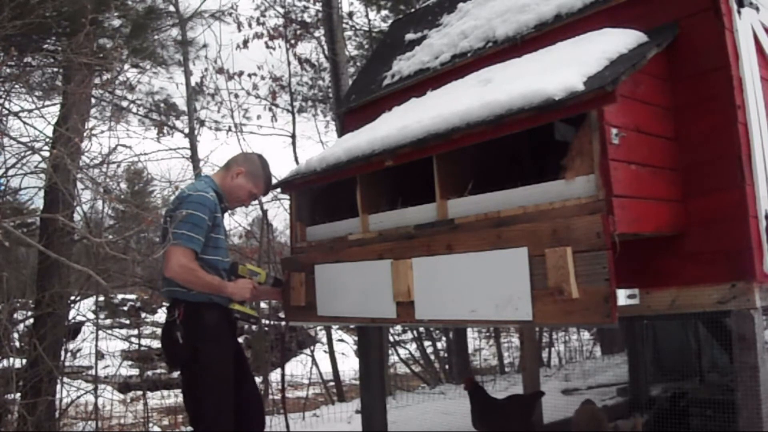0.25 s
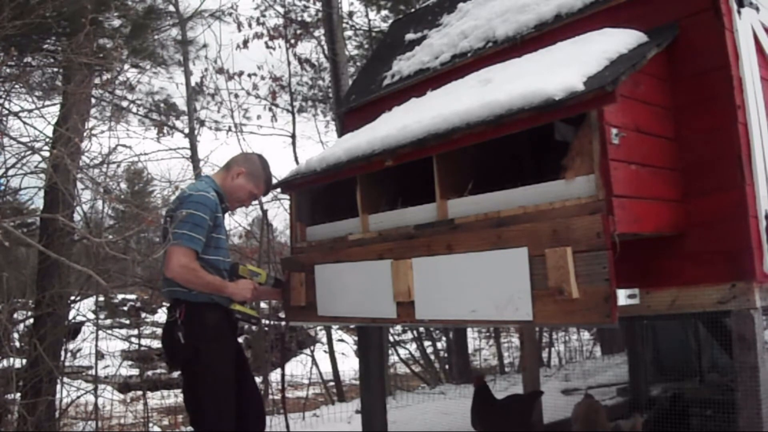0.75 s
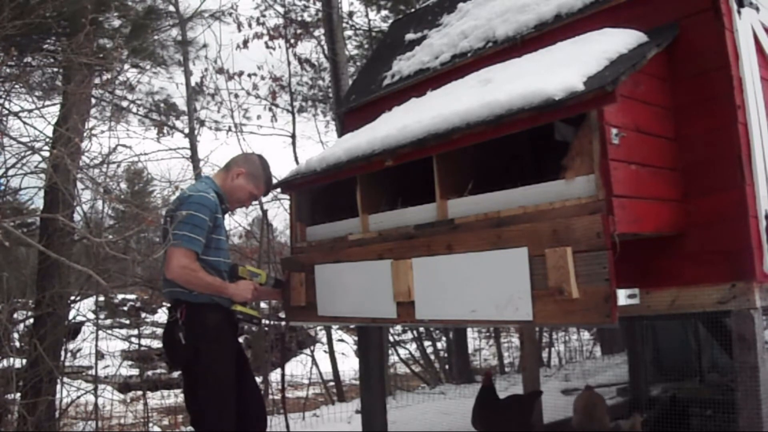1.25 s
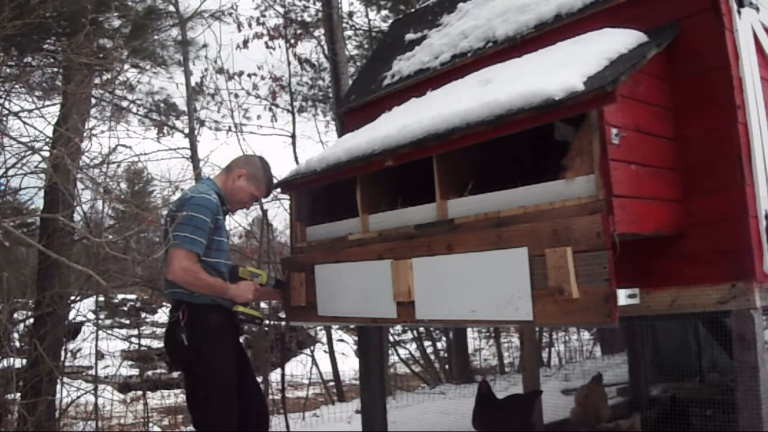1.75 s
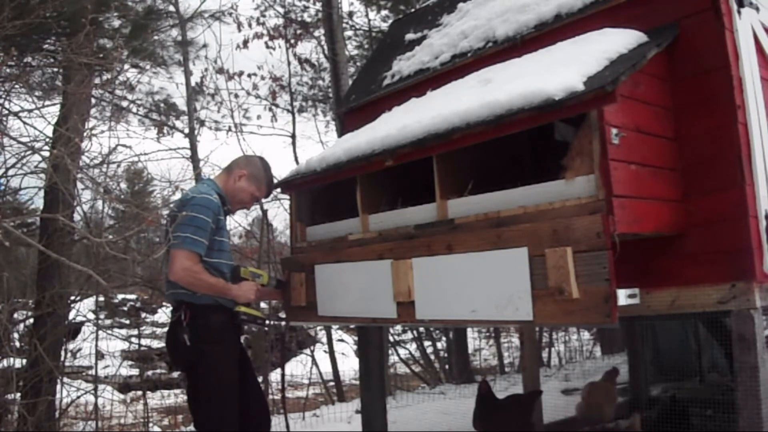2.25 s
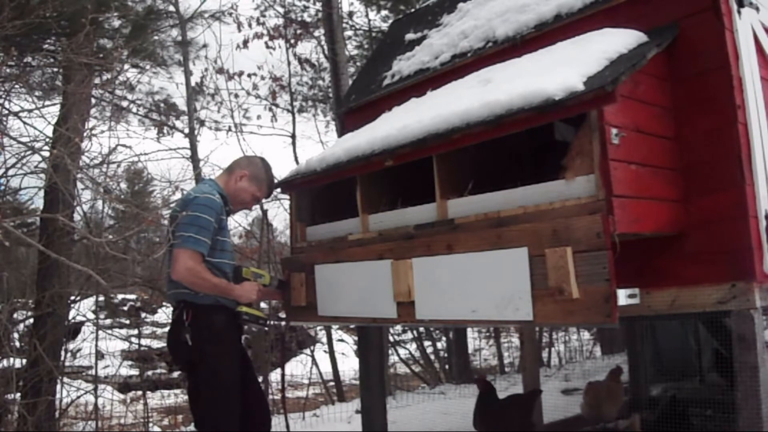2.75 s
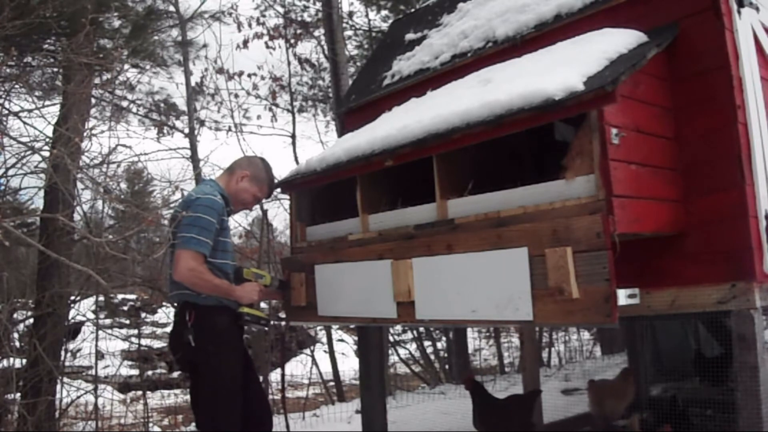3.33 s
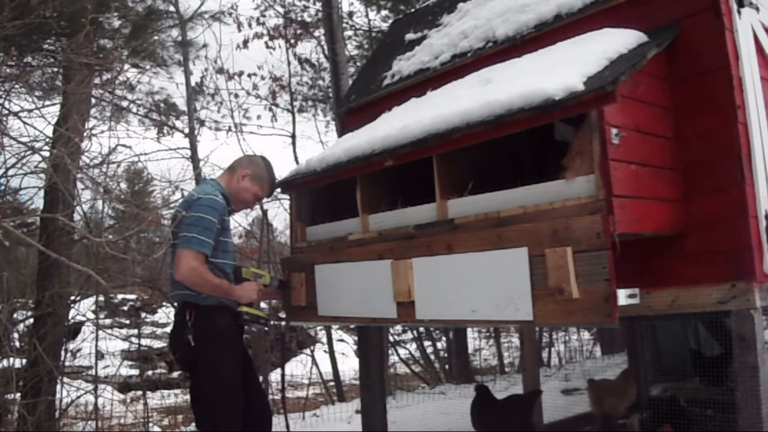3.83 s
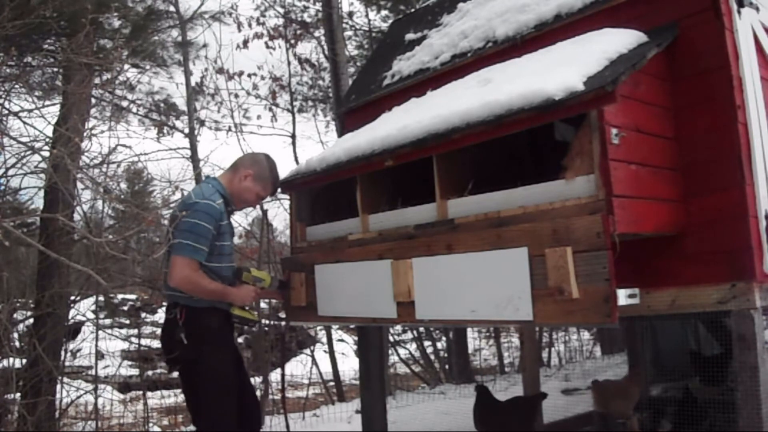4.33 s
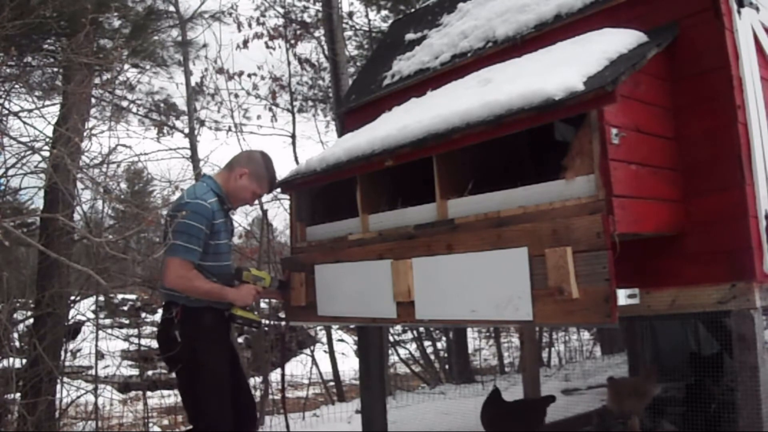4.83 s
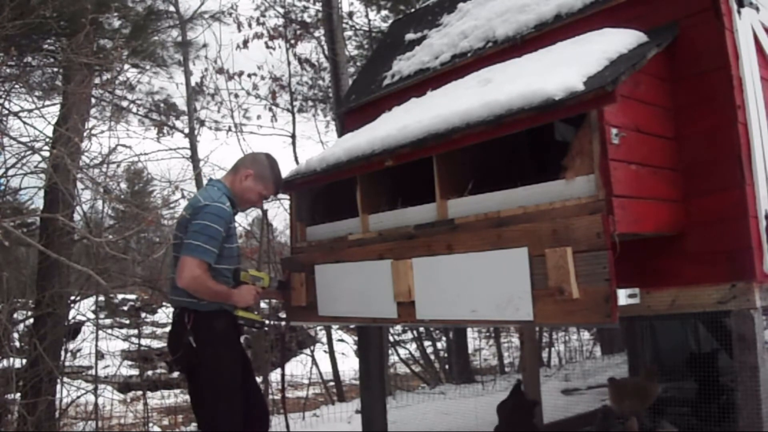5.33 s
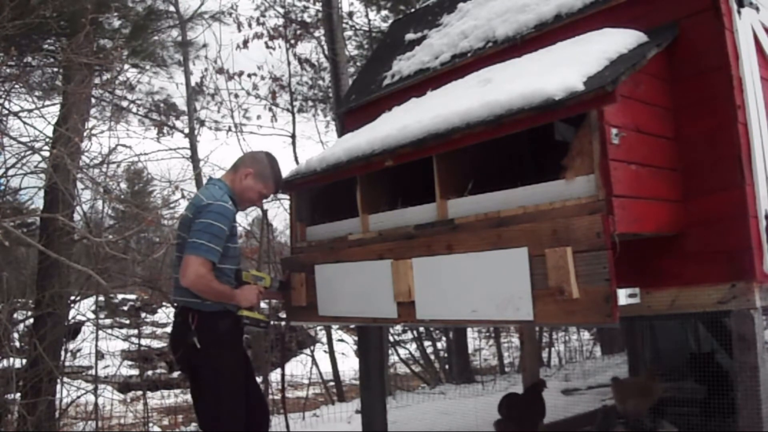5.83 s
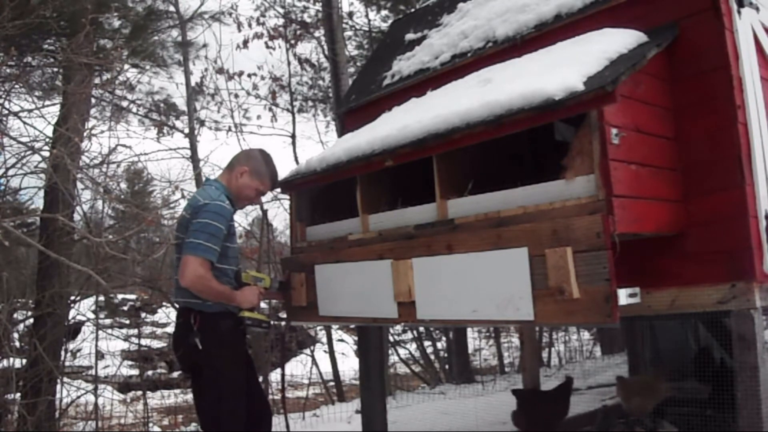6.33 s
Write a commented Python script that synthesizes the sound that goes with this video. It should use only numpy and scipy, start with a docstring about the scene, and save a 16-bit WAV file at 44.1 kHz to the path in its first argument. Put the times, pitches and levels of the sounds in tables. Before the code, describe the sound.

In still outdoor air, a cordless drill a few metres away pulses six times, its gears whining and rasping, then runs longer and winds down. A few soft clicks fill a quiet gap. The drill runs twice more, and each time the bit slips with a loud clack that briefly rings the wooden boards. Close to the microphone, a camera faintly whistles and buzzes throughout.

```python
"""Outdoors at a wooden hen house, a cordless drill a few metres from a camcorder's microphone.
Still air and the camera's faint whistle and buzz lie under it all. Six short pulls of the trigger come first,
then a longer one: the switch squeals, the gears whine and rasp, and at 2.4 s the bit jumps in the screw.
A pause follows, with a few soft clicks. From 5.2 s come two last pulls, each with a loud clack that rings
the boards and ducks the camera's gain."""
import sys
import numpy as np
from scipy import signal
from scipy.fft import rfft, irfft
from scipy.io import wavfile
from scipy.ndimage import uniform_filter1d

SR = 44100
rng = np.random.default_rng(int(sys.argv[2]) if len(sys.argv) > 2 else 0)


def bounce(signal):
    """Save signal as a 16-bit WAV file at the path given by the first command-line argument."""
    frames = np.transpose(np.atleast_2d(signal))
    limited = np.clip(frames, -1, 1)
    pcm = np.round(limited * 32767).astype(np.int16)
    wavfile.write(sys.argv[1], SR, pcm)


N = 289516
TIME = np.arange(N) / SR
BINS = np.fft.rfftfreq(N, 1 / SR)


def gain_of(db):
    """Decibels to an amplitude factor."""
    return 10 ** (np.asarray(db) / 20)


def unit_rms(x):
    """Scales to rms 1."""
    return x / np.sqrt(np.mean(x ** 2) + 1e-20)


def curve(points, hz=BINS):
    """Reads a table of (f/Hz, value) on a log-frequency axis."""
    f, value = np.transpose(points)
    return np.interp(np.log(hz + 1), np.log(f + 1), value)


def humps(modes):
    """Resonances as bumps in dB over frequency."""
    return sum(db / (1 + (2 * (BINS - hz) / width) ** 2) for hz, width, db in modes)


def colour(x, db):
    """A minimum-phase filter with the given gain in dB at each bin."""
    log_gain = np.log(gain_of(db))
    phase = -signal.hilbert(np.r_[log_gain, log_gain[-2:0:-1]]).imag[:len(BINS)]
    return irfft(rfft(x) * np.exp(log_gain + 1j * phase), N)


def drift(rate_hz):
    """A random wander of rms 1, mostly slower than rate_hz."""
    return unit_rms(irfft(rfft(rng.standard_normal(N)) / (1 + (BINS / rate_hz) ** 4), N))


def add(mix, start_s, sound):
    """Mixes a sound in at a time."""
    part = mix[round(start_s * SR):][:len(sound)]
    part += sound[:len(part)]


def air(level_db=-45):
    """The still air of the woods, a low wash, and the microphone's hiss with one narrow band standing out."""
    # spectrum of air and hiss: f/Hz, relative level/dB
    wash = [(12, -35), (20, 3.5), (53, -0.5), (146, -3), (193, -2.5), (255, -4), (574, -7.5), (1530, -13),
            (1910, -15), (2820, -13), (4810, -18), (10200, -19), (11400, -16.5), (12400, -18.5),
            (16000, -28)]
    noise = colour(rng.standard_normal(N), curve(wash) + humps([(7850, 260, 8.8)]))
    return gain_of(level_db) * unit_rms(noise)


def camera_whistles(high_hz=15734, high_db=-59):
    """At the microphone, two thin electronic tones: the lower swells and fades, the higher holds steady."""
    # contour of the lower tone: t/s, relative level/dB
    contour = [(0, -42.5), (.7, -47), (1.2, -46), (2.1, -50), (2.5, -46.5), (3.75, -48), (4.07, -61),
               (4.35, -44), (4.63, -54), (4.82, -43.5), (5.11, -58), (5.4, -43), (5.8, -47), (6.12, -59),
               (6.35, -43), (6.56, -45.5)]
    low = gain_of(np.interp(TIME, *np.transpose(contour)) - 3) * np.sin(2 * np.pi * 11719 * TIME)
    high = gain_of(high_db) * np.sin(2 * np.pi * high_hz * TIME)
    return np.sqrt(2) * (low + high)


def lens_motor(level_db=-50, first_s=.665, burst_s=.355, step_hz=61.2):
    """Beside the microphone the lens motor buzzes once a second, each step a dying puff of noise."""
    # resonances of the lens drive: f/Hz, width/Hz, level/dB
    lens_modes = [(3740, 670, 15.5), (4890, 490, 15.5), (7270, 190, 22.5), (9470, 1400, 19.5),
                  (12200, 830, 23)]
    tilt_db = curve([(1000, -15), (3000, 0.5), (12000, -9.0), (15000, -2)])
    moving = (TIME > first_s) & ((TIME - first_s) % 1 < burst_s)
    steps = np.exp(-(TIME * step_hz % 1) / 0.58) * rng.standard_normal(N)
    return gain_of(level_db) * moving * unit_rms(colour(steps, humps(lens_modes) + tilt_db))


def yard(x, wall_db=-13, wall_s=.0042, scatter_db=-21, taps_per_s=2000):
    """The direct sound, one quick reflection off the hen house, then a thin scatter from the trees."""
    # decay of the yard's echo: f/Hz, t60/s
    decay = [(300, 0.36), (3000, 0.23), (10000, 0.13)]
    count = SR // 3
    taps = rng.standard_normal(count) * (rng.random(count) < taps_per_s / SR) * (TIME[:count] > .008)
    hz, t, spectra = signal.stft(taps, SR, nperseg=256)
    tail = signal.istft(spectra * gain_of(-60 * t / curve(decay, hz)[:, None]), SR, nperseg=256)[1]
    echo = gain_of(scatter_db) * tail / np.linalg.norm(tail)
    echo[round(wall_s * SR)] += gain_of(wall_db)
    return x + signal.fftconvolve(x, echo)[:N]


def trigger():
    """The speed switch chops the current at a pitch that sags as the motor takes load."""
    # squeals of the switch: t/s, length/s, first f/Hz, last f/Hz, level/dB
    squeals = [(0.07, .048, 5320, 5270, -46.5), (0.42, 0.041, 5340, 5070, -46),
               (0.73, 0.033, 5230, 5020, -43), (1.05, 0.029, 5270, 5000, -44),
               (1.343, 0.023, 5340, 5030, -45), (1.712, 0.038, 5300, 5020, -43.5),
               (2.134, 0.024, 5350, 5000, -44), (6.185, 0.018, 5330, 5100, -52)]
    out = np.zeros(N)
    for start, length, first_hz, last_hz, db in squeals:
        hz = np.linspace(first_hz, last_hz, int(length * SR))
        tone = np.sqrt(2) * np.sin(2 * np.pi * np.cumsum(hz) / SR)
        add(out, start, gain_of(db) * tone * signal.windows.tukey(len(hz), .4))
    return out


def clacks(slip_s=.004, slip_db=-6.5, clack_t60=.01, tick_t60=.012, rattle_t60=.085, rattle_db=-14):
    """The bit jumps: a scrape swells to a crunch in the tool, steel ticks, and rattle and boards ring on."""
    # knocks of bit, screw and chuck: t/s, then relative level/dB of boards, tool and steel
    knocks = [(2.3906, -51, -24, -7), (3.8915, -65, -41.5, -52), (4.1206, -70, -66, -38),
              (4.4925, -63, -37, -46), (5.2505, -67, -33, -28), (5.2768, -62, -16.5, -19),
              (5.5965, -20.5, -5, -8), (5.619, -29.5, -22, -52), (5.6262, -55, -31, -14),
              (6.3917, -18.5, -9, -11), (6.422, -35, -26.5, -42), (6.514, -72, -49, -34.5)]
    # modes of the boards: f/Hz, level/dB, t60/s
    boards = [(198, -17.5, 0.16), (350, -26, 0.066), (507, -2.5, 0.042), (775, -1.5, 0.091),
              (827, -1.5, 0.066), (935, -7, 0.043), (1125, -4, 0.044), (1260, -7, 0.029)]
    # spectra of the tool's clack and the steel's tick: f/Hz, relative level/dB
    clack_spectrum = [(300, -24), (620, -27), (760, -8.5), (920, -18), (1100, -14), (1300, -7), (1500, -13),
                      (1900, -2.5), (2800, 2), (4100, -0.5), (5000, -16), (8000, -21), (12500, -37),
                      (15000, -66)]
    tick_spectrum = [(1500, -39), (3500, -5.5), (5400, -6), (6500, -15), (8500, -7), (9800, 0.5),
                     (11500, -9.5), (13500, -9.5), (15000, -35), (16000, -26)]
    t = np.arange(SR // 5) / SR
    landed = np.maximum(t - slip_s, 0)
    swell = gain_of(slip_db * np.maximum(1 - t / slip_s, 0))
    crunch = swell * (gain_of(-60 * landed / clack_t60) + gain_of(rattle_db - 60 * landed / rattle_t60))
    wood, tool, steel = np.zeros((3, N))
    for at, boards_db, tool_db, steel_db in knocks:
        tool_noise, steel_noise = rng.choice([-1., 1.], (2, len(t)))
        ring = sum(gain_of(db - 60 * t / t60) * np.sin(2 * np.pi * hz * rng.uniform(1.0, 1.03) * t)
                   for hz, db, t60 in boards)
        add(wood, at - slip_s / 2, gain_of(boards_db - 3) * ring / np.std(ring[:SR // 200]))
        add(tool, at - slip_s, gain_of(tool_db) * tool_noise * crunch)
        add(steel, at, gain_of(steel_db) * steel_noise * gain_of(-60 * t / tick_t60))
    unit_power_db = lambda points: 20 * np.log10(unit_rms(gain_of(curve(points))))
    return wood + colour(tool, unit_power_db(clack_spectrum)) + colour(steel, unit_power_db(tick_spectrum))


def motor(jolt_s=.048, unload_s=.03, take_up_s=.028, slack_s=.11):
    """Each pull spins the motor up, lets it coast and brakes it; gives pitch and three levels over time."""
    # pulls of the trigger: start t/s, easing t/s, stop t/s, full-speed whine f/Hz, spin-up/s, coast/s,
    # braking/s, then relative level/dB of drill, starting jolt, change once eased, whine and overtones
    pulls = [(.094, .19, .308, 3148, .04, .24, .046, -37.5, -4.5, 1, 3.5, -6),
             (.435, .54, .652, 3272, 0.048, .216, .046, -36, 1, 1.5, 1.5, -9),
             (.74, .88, .991, 3200, .05, .257, .046, -34, -2, -0.5, 1.5, -11),
             (1.056, 1.2, 1.324, 3167, .057, .19, .046, -33.5, 0, -1, 2, -9),
             (1.335, 1.515, 1.656, 3222, 0.074, .245, .055, -33, -2, 0.5, 2, -6),
             (1.718, 1.92, 2.092, 3164, 0.076, .195, .046, -32.5, 5, 0, 3.5, -5),
             (2.14, 2.8, 3.27, 2980, .064, .26, .046, -33.5, 6, -0.5, 3, -2.5),
             (5.236, 5.37, 5.725, 2858, 0.042, 1.15, 0.076, -35, -4.5, 3, 1.5, -4.5),
             (6.191, 6.335, 6.46, 2408, .051, .28, .05, -35, -1.5, -13, 0, 3.5)]
    controls = np.zeros((4, N))
    for start, ease, stop, full_hz, spin_s, coast_s, brake_s, *levels in pulls:
        pull_db, jolt_db, eased_db, whine_db, overtone_db = levels
        running = (TIME > start) & (TIME < stop)
        t = TIME[running]
        eased = np.maximum(t - ease, 0)
        spin_up = 1 - np.exp(-(t - start) / spin_s)
        coast = np.exp(-(eased / coast_s) ** 1.4)  # holds its speed at first, then runs down
        brake = np.minimum((stop - t) / brake_s, 1)
        speed = spin_up * coast * brake
        octaves = np.log2(speed + 1e-6)
        level_db = pull_db + 4 * octaves  # louder with speed
        level_db += jolt_db * np.exp(-(t - start) / jolt_s)
        level_db -= 7 * np.maximum(1 - (t - start) / take_up_s, 0)  # the gears take up their play
        level_db += eased_db * (1 - np.exp(-eased / unload_s))  # the load comes off
        level_db -= 18.5 * (1 - brake)  # the gears fall quiet under the brake
        slack_db = -3 * (1 - np.exp(-eased / slack_s))  # coasting teeth press less: the whine sinks
        chatter_db = -3.5 * np.maximum(octaves, -2)  # slow gears chatter: their overtones stand out
        controls[:, running] = [full_hz * speed, level_db, whine_db + slack_db, overtone_db + chatter_db]
    return controls


def gear_whine(angle, whine_db, overtone_db):
    """Meshing teeth sound through the gear case; play in the gears lets each tone flutter on its own."""
    # gear tones around the whine and among its overtones: multiple of the motor speed, level/dB
    whine_orders = [(14.5, -8.5), (15, -10.5), (16, 0), (17, -29)]
    overtone_orders = [(32, 3), (33, -20), (40, -8), (48, -1), (56, -2.5), (64, -2), (80, -8)]
    # how well the gear case passes them: f/Hz, level/dB
    gear_case = [(1500, -34), (2000, -21.5), (2250, -9.5), (2500, -9), (2750, 2), (3050, -7), (3600, -12.5),
                 (3900, -5), (4300, -12), (4750, -15), (5050, -20), (5350, -17), (5600, -24), (8000, -49.5)]

    def stack(orders):
        return sum(gain_of(db + 1.8 * drift(70)) * np.cos(order * (angle + .018 * drift(80)))
                   for order, db in orders)

    tones = gain_of(whine_db) * stack(whine_orders) + gain_of(overtone_db) * stack(overtone_orders)
    return colour(tones, curve(gear_case))


def rasp(angle, whine_hz, fizz_hz=4600, fizz_fade_db=14, brush_order=67):
    """Scraping teeth and brushes ring the housing; the brushes' fizz and thin tone fade at low speed."""
    # what the housing radiates: f/Hz, relative level/dB
    housing = [(300, -25), (1400, -32), (1750, -18.5), (2400, -18), (5000, -15.5), (6100, -20.5),
               (7500, -18.5), (9700, -13.5), (11500, -16.5), (13000, -23.5), (14500, -46)]
    # its resonances: f/Hz, width/Hz, level/dB
    housing_modes = [(2320, 82, 9.5), (2781, 307, 15), (3088, 280, 10.5), (3470, 220, -5),
                     (4104, 1050, 9.5), (5330, 84, 7.5), (6820, 83, 9.5)]
    throb = 1 + .18 * np.cos(angle)  # the teeth scrape harder once a turn
    scrape = rng.standard_normal(N) * throb * gain_of(1.5 * drift(700))  # no two catch alike
    radiated = unit_rms(colour(scrape, curve(housing) + humps(housing_modes)))
    dull = signal.sosfiltfilt(signal.butter(2, fizz_hz, fs=SR, output="sos"), radiated)
    fizz = radiated - dull + gain_of(-24) * np.cos(brush_order * angle)
    slowness = np.maximum(1 - whine_hz / 2200, 0)
    return dull + fizz * gain_of(-fizz_fade_db * slowness)


def drill(teeth=16, wobble=.0029, silent_hz=327, turning_hz=615):
    """Whine and rasp follow the motor's slightly unsteady shaft and fade in as it gets turning."""
    whine_hz, level_db, whine_db, overtone_db = motor()
    angle = 2 * np.pi * np.cumsum(whine_hz * (1 + wobble * drift(72))) / teeth / SR
    gears = gain_of(7) * gear_whine(angle, whine_db, overtone_db) + gain_of(6) * rasp(angle, whine_hz)
    turning = np.clip((whine_hz - silent_hz) / (turning_hz - silent_hz), 0, 1)
    return turning * gain_of(level_db) * gears


def scene():
    """One microphone, alike in both channels: the drill across the yard, the air, the camera close by."""
    mono = yard(drill() + trigger() + clacks()) + air() + camera_whistles() + lens_motor()
    return np.array([mono, mono])


def record(dry, threshold_db=-21, slope=.78, recovery_db_per_s=17, attack_s=.012, limit_hz=15950):
    """The camera's gain, most alert to treble, ducks at loud clacks and creeps back; then clip and low-pass."""
    treble = np.diff(dry[0], prepend=0)
    power_db = 10 * np.log10(abs(uniform_filter1d(treble ** 2, size=88)) + 1e-12)
    fall_db = TIME * recovery_db_per_s
    held_db = np.maximum.accumulate(power_db + fall_db) - fall_db
    over_db = np.maximum(held_db - threshold_db, 0)
    lag = np.exp(-1 / (attack_s * SR))
    duck_db = slope * signal.lfilter([1 - lag], [1, -lag], over_db)
    clipped = np.clip(dry / gain_of(duck_db), -1, 1)
    lowpass = signal.firwin(511, limit_hz, window=("kaiser", 9), fs=SR)
    return signal.oaconvolve(clipped, lowpass[None], "same")


dry = scene()
out = record(dry)
bounce(out)
```